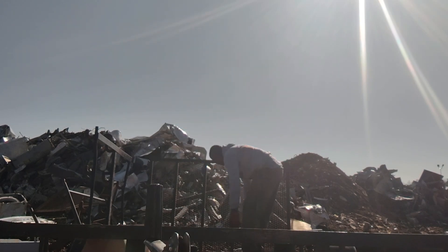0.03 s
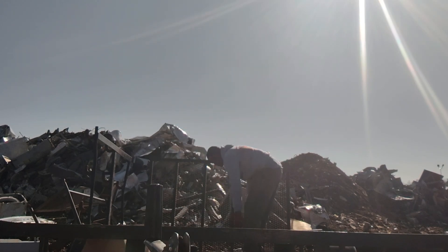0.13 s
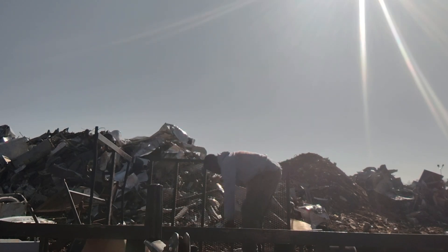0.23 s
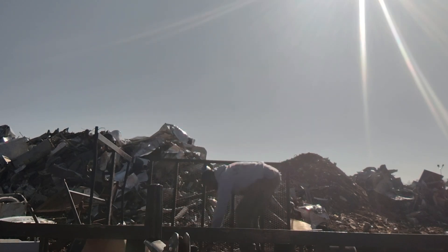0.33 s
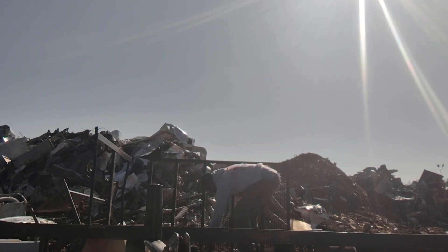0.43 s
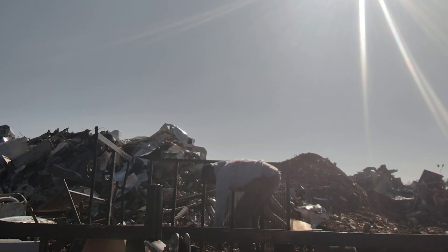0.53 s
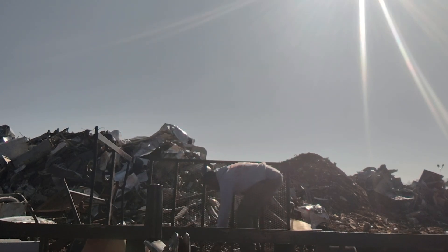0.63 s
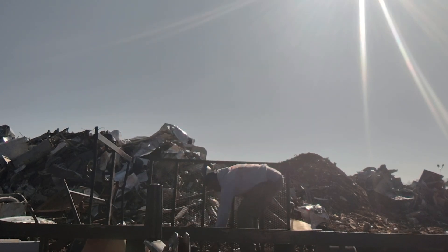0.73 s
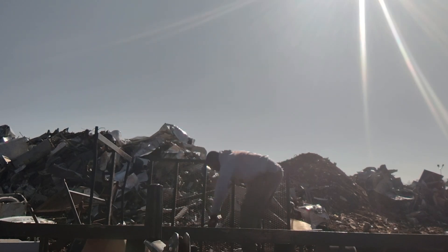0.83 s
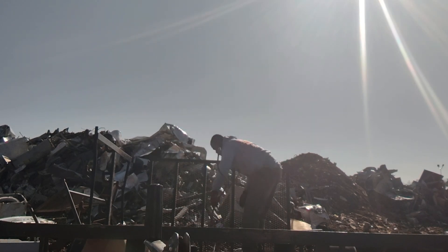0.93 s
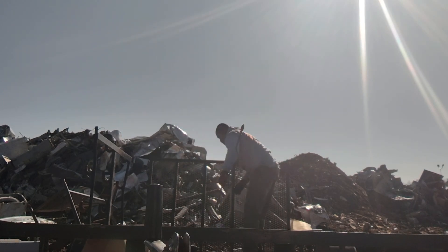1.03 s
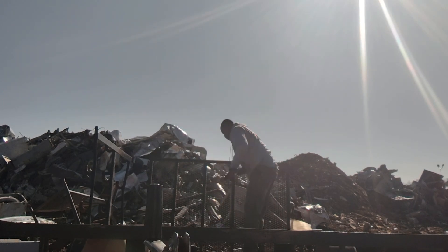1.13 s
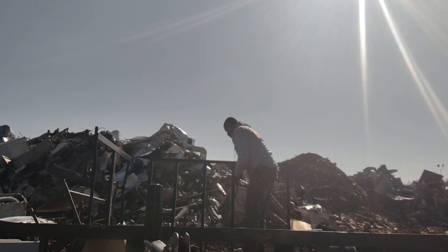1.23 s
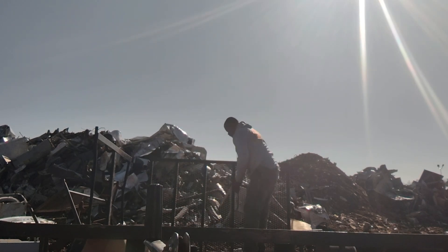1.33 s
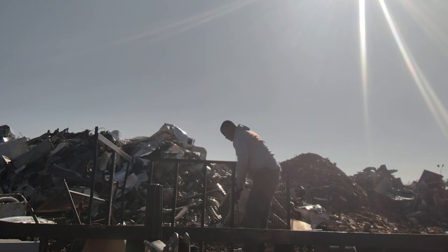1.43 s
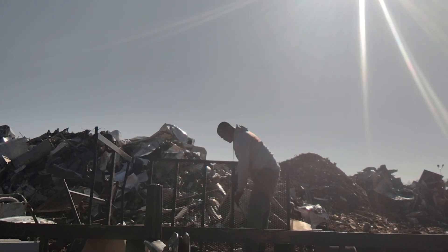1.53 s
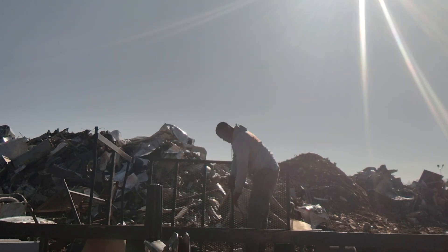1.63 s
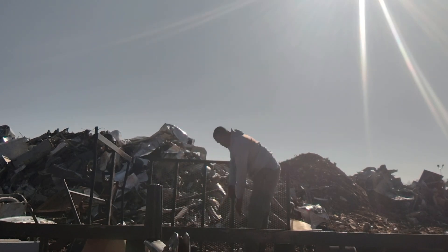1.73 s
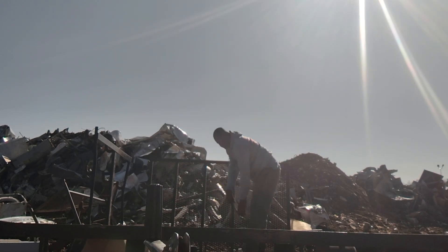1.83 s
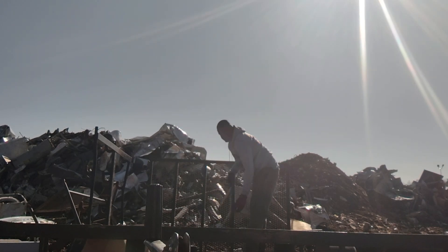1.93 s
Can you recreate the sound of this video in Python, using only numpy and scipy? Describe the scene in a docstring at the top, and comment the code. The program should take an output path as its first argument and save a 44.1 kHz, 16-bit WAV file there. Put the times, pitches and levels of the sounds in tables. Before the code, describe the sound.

Scrap metal clanks on a steel trailer deck: light taps, then a loud, dense clatter from 0.2 to 0.5 s with gritty scraping, bright clinks and a piercing squeal near 0.3 s. Softer knocks follow, a sharp clank at 0.9 s, scattered taps until 1.27 s, a lull, then a double knock with a faint ring at 1.72 s. Short heap echoes; a distant engine idles low beneath in the open yard.

```python
"""An open yard: a dragged edge scrapes and loose metal rattles on a steel trailer deck (shaped grains of noise),
while an engine idles some way off (pulses through resonances) over a steady bed of noise. Scrap pulled off
knocks the deck while small parts clink (decaying modes and noise); heaps throw back a short echo. A rubbed edge
squeals at two pitches (unsteady sines), and brief rings sound (resonated noise). The loudest peaks are limited
and the treble stops at 16 kHz."""
import sys
import numpy as np
from scipy import signal
from scipy.fft import rfft, irfft
from scipy.io import wavfile
from scipy.ndimage import uniform_filter1d

SR = 44100
rng = np.random.default_rng(int(sys.argv[2]) if len(sys.argv) > 2 else 0)


def digitize_waveform(pressure):
    """Quantize a signal to 16-bit integers and store it at the path in sys.argv[1].

    Rows of a 2-D input are taken as channels; values are limited to [-1, 1].
    """
    field = np.atleast_2d(pressure).T
    bounded = np.clip(field, -1, 1)
    quanta = np.round(bounded * 32767).astype(np.int16)
    wavfile.write(sys.argv[1], SR, quanta)


N = 88200
TIME_S = np.arange(N) / SR


def undb(db):
    """Turn dB into an amplitude factor."""
    return 10 ** (np.asarray(db) / 20)


def level(x, db):
    """Scale a sound to an rms level in dB."""
    return x * undb(db) / np.sqrt(np.mean(x ** 2))


def colour(x, table):
    """Weight the spectrum by (Hz, dB) points joined on a log frequency axis."""
    points = np.array(table)
    f = np.fft.rfftfreq(x.shape[-1], 1 / SR) + 1  # +1 Hz avoids log(0)
    gain_db = np.interp(np.log(f), np.log(points[:, 0]), points[:, 1])
    return irfft(rfft(x) * undb(gain_db), x.shape[-1])


def walk(rate):
    """Wander smoothly around zero, with `rate` new random targets a second and a spread near 2."""
    hold = int(SR / rate)
    steps = np.repeat(rng.standard_normal(N // hold + 1), hold)
    return 2.9 * uniform_filter1d(uniform_filter1d(steps, hold), hold)[:N]


def resonate(x, hz, width_hz):
    """Ring one mode; a narrower width rings longer."""
    return signal.lfilter(*signal.iirpeak(hz, hz / width_hz, fs=SR), x)


def patter(per_s, spread_db, grain_s, table):
    """Scatter dense small impacts of uneven size, each a short burst of noise."""
    hits = (rng.random(N) < per_s / SR) * undb(spread_db * rng.exponential(size=N))
    fade = np.exp(-np.arange(SR // 20) / SR / grain_s)
    power = np.convolve(hits ** 2, fade)[:N]
    return level(colour(np.sqrt(power) * rng.standard_normal(N), table), 0)


def blows(events, modes, octaves, rise_s, noise_db):
    """Each blow rings the modes near its centre, with a burst of noise centred alike."""
    scatter_db = 2  # uneven mode strengths
    out, modes_hz = np.zeros(N + SR), np.array(modes)
    t = np.arange(SR // 4) / SR
    f = np.fft.rfftfreq(len(t), 1 / SR) + 1
    low_cut = 1 / (1 + (0.33 * modes_hz[0] / f) ** 6)
    high_cut = 1 / (1 + (f / (3.16 * modes_hz[-1])) ** 3)
    for at, peak_db, centre_hz, t60 in events:
        def bell(hz):
            return np.exp(-.5 * (np.log2(hz / centre_hz) / octaves) ** 2)

        strength, detune, phase = rng.standard_normal((3, len(modes_hz)))
        weights = undb(scatter_db * strength) * bell(modes_hz)
        blow_hz = modes_hz * (1 + 0.0044 * detune)
        ring = weights @ np.sin(2 * np.pi * np.outer(blow_hz, t) + phase[:, None])
        spectrum = rfft(rng.standard_normal(len(t))) * bell(f) * low_cut * high_cut
        noise = irfft(spectrum, len(t))
        decay = np.exp(-np.log(1000) * t / max(t60, .005))
        blow = (1 - np.exp(-t / rise_s)) * decay * (level(ring, 0) + level(noise, noise_db))
        start = int(at * SR)
        out[start:start + len(t)] += blow * undb(peak_db) / np.abs(blow).max()
    return out[:N]


# A dragged edge on the deck. Each row: start in seconds, length in seconds, level in dB.
SCRAPE_SPANS = [(-.02, 0.068, -43.5), (0.078, 0.041, -35.5), (0.199, 0.19, -30), (0.429, 0.034, -39.5),
                (0.882, 0.035, -26.5), (0.947, 0.413, -56), (1.655, 0.15, -51), (1.751, 0.069, -41.5)]
# Treble colour of the scrape. Each row: frequency in Hz, weight in dB.
SCRAPE_TINT = [(1000, -42), (3700, -0.5), (6000, -2), (9200, -8), (16000, -8.5)]


def scrapes():
    """A dragged edge makes a dense grit of tiny impacts, heard in the treble."""
    rise_s, fade_s = 0.018, 0.023
    drag = np.zeros(N)
    for at, span, db in SCRAPE_SPANS:
        rise = np.clip((TIME_S - at) / rise_s, 0, 1)
        fade = np.exp(-np.maximum(TIME_S - at - span, 0) / fade_s)
        drag += undb(db) * rise * fade
    return patter(per_s=1500, spread_db=3, grain_s=.002, table=SCRAPE_TINT) * drag


# Loose metal on the deck. Each row: time in seconds, level in dB of the taps before the deck's ring is added.
RATTLE_LEVELS = [(0, -36), (0.186, -44), (0.212, -29.5), (0.402, -24.5), (0.501, -35.5), (0.618, -41),
                 (.87, -37.5), (.92, -33), (1.099, -41.5), (1.6, -58.5), (1.72, -47), (1.76, -38.5),
                 (1.902, -50), (2, -43.5)]
# Colour of the taps. Each row: frequency in Hz, weight in dB.
RATTLE_TINT = [(150, -11.5), (300, 5), (600, 5.5), (1500, -0.5), (2400, -7), (3400, -16), (5000, -19.5)]
# Modes of the steel deck, shared with the knocks. Each entry: frequency in Hz.
DECK_MODES = [321, 432.5, 499.5, 659.6, 774.5, 893.6, 1055, 1229.6, 1498, 1625, 1925, 2172]


def rattle():
    """Loose pieces tap the deck and ring its modes."""
    at, db = np.array(RATTLE_LEVELS).T
    taps = patter(per_s=700, spread_db=2.2, grain_s=.002, table=RATTLE_TINT)
    deck = sum(resonate(taps, hz, width_hz=35) for hz in DECK_MODES)
    return (taps + deck) * undb(np.interp(TIME_S, at, db))


# Exhaust and casing resonances. Each row: frequency in Hz, width in Hz, weight in dB.
ENGINE_MODES = [(200.6, 11.8, -4), (304.8, 20, 3), (646, 13.9, -14)]


def engine():
    """Idling some way off, uneven firings ring the exhaust and casing."""
    firing_hz, scatter_db, level_db = 35.86, 1.5, -48
    cycle = np.cumsum(firing_hz * (1 + 0.0024 * walk(2))) / SR
    firings = np.diff(np.floor(cycle), prepend=0) * undb(scatter_db * rng.standard_normal(N))
    pulses = np.convolve(firings, np.hanning(SR // 800))[:N]
    body = np.zeros(N)
    for hz, width_hz, db in ENGINE_MODES:
        body += undb(db) * resonate(pulses, hz, width_hz) * hz / width_hz
    return level(colour(body, [(120, -22), (170, -9)]), level_db)


# Colour of the open yard. Each row: frequency in Hz, weight in dB.
YARD_TINT = [(25, -24.5), (100, -25), (175, -1), (320, 5.5), (700, -23), (1300, -11.5), (3300, -28),
             (16000, -34.5)]


def yard():
    """The steady bed of the open yard is coloured noise."""
    return level(colour(rng.standard_normal(N), YARD_TINT), -48)


# Pieces knocking the deck. Each row: start in seconds, peak in dB at the source, centre in Hz,
# time to fall 60 dB in seconds.
DECK_KNOCKS = [(.063, -18, 1570, 0.028), (.097, -23.5, 1380, 0.043), (.202, -17.5, 790, 0.067),
               (.2135, -1, 1850, 0.024), (.2185, -1.5, 1430, 0.051), (.233, -6.5, 810, 0.055),
               (.268, -8.5, 1650, 0.14), (.293, -11.5, 537, 0.056), (.305, -19, 684, 0.087),
               (.324, -10.5, 1400, 0.049), (.338, -14, 1720, 0.2), (.373, -2.5, 1780, 0.0113),
               (.385, -9, 1700, 0.038), (.4305, -9.5, 660, 0.1), (.449, -9, 594, 0.11),
               (.506, -17, 590, 0.13), (.654, -18.5, 1600, 0.045), (.734, -20, 1570, 0.027),
               (.811, -26, 1620, 0.041), (.817, -17, 1650, 0.011), (.906, -5.5, 1850, 0.029),
               (.918, -18.5, 740, 0.086), (.947, -20.5, 1550, 0.015), (.967, -13, 1730, 0.022),
               (1.0155, -14.5, 403, 0.023), (1.044, -22, 500, 0.016), (1.088, -20, 1070, 0.036),
               (1.113, -26, 2100, 0.024), (1.1955, -18, 1870, 0.019), (1.222, -23.5, 1650, 0.047),
               (1.247, -9.5, 1695, 0.033), (1.267, -29, 1490, 0.026), (1.7205, -6.5, 1465, 0.022),
               (1.7225, -11.5, 750, 0.032)]


def knocks():
    """Pieces of scrap strike the deck and ring the modes near each blow's centre."""
    return blows(DECK_KNOCKS, DECK_MODES, octaves=0.46, rise_s=0.00059, noise_db=-7)


def heap_echo(near):
    """Heaps scatter the near sounds back as a short, dulled, decaying tail."""
    gap_s, t60_s, echo_db, top_hz = 0.003, 0.28, -10, 3600
    t = np.arange(SR // 3) / SR
    tail = rng.standard_normal(len(t)) * np.exp(-np.log(1000) * t / t60_s) * (t > gap_s)
    tail /= np.sqrt(np.sum(tail ** 2))
    echo = signal.fftconvolve(near, tail)[:N] * undb(echo_db)
    return signal.lfilter(*signal.butter(1, top_hz, fs=SR), echo)


# Small parts clinking. Each row: start in seconds, peak in dB at the source, centre in Hz,
# time to fall 60 dB in seconds.
PART_CLINKS = [(.147, -23.5, 8340, 0.014), (.251, -18, 9900, 0.011), (.344, -9.5, 10400, 0.021),
               (.371, -5.5, 10900, 0.018), (.424, -31, 10900, 0.012), (.6535, -16, 6650, 0.03),
               (.693, -20, 8300, 0.092), (.735, -24.5, 10300, 0.015), (.8805, -11.5, 8700, 0.014),
               (.9195, -12, 7960, 0.071), (1.195, -27.5, 4840, 0.048), (1.223, -35, 4180, 0.036),
               (1.2465, -14, 4500, 0.034), (1.721, -31, 4410, 0.07), (1.761, -24.5, 11500, 0.2)]
# Modes of the small parts. Each entry: frequency in Hz.
PART_MODES = [4420, 5070, 5430, 6424, 7470, 10280, 10940, 11740, 13350, 13720]


def clinks():
    """Small parts ring high modes under a stronger burst of noise."""
    return blows(PART_CLINKS, PART_MODES, octaves=0.87, rise_s=0.00011, noise_db=5)


# Higher and lower squeal of a rubbed edge. Each row: time in seconds, rms level in dB before panning.
HIGH_SQUEAL = [(.238, -34), (.254, -21.5), (.294, -9.5), (.308, -30), (.319, -18), (.366, -26.5),
               (.374, -39)]
LOW_SQUEAL = [(.25, -48), (.256, -30.5), (.286, -32), (.306, -23), (.324, -23), (.338, -36.5)]


def squeal(table, hz, pan_db):
    """A rubbed edge sings one slightly unsteady sine; positive pan leans left."""
    at, db = np.array(table).T
    phase = 2 * np.pi * np.cumsum(hz * (1 + 0.0022 * walk(130))) / SR
    tone = np.sin(phase) * np.sqrt(2) * undb(np.interp(TIME_S, at, db, -120, -120))
    return tone * undb(np.array([[.5], [-.5]]) * pan_db)


# Brief rings. Each row: start in seconds, length in seconds, frequency in Hz, rms level in dB before fading.
BRIEF_RINGS = [(0.373, 0.02, 5860, -19), (0.668, 0.14, 5680, -46), (0.975, 0.027, 5460, -39),
               (1.76, 0.094, 3770, -38), (1.763, 0.19, 5840, -47.5)]


def rings():
    """Rough rubbing, as noise, keeps single modes sounding for a moment."""
    out = np.zeros(N)
    for at, span, hz, db in BRIEF_RINGS:
        mode = level(resonate(rng.standard_normal(N), hz, width_hz=70), db)
        rise, fade = (TIME_S - at) / 0.0026, (at + span - TIME_S) / span
        out += mode * np.clip(np.minimum(rise, fade), 0, 1)
    return out


# Left-right difference. Each row: frequency in Hz, weight in dB.
SIDE_TINT = [(300, -11), (1200, -14), (3500, -8), (13000, -6)]


def wander(mid):
    """Sounds shift a little left and right from moment to moment."""
    side = colour(mid * np.tanh(walk(150)), SIDE_TINT)
    return mid + np.outer([1, -1], side)


def scene():
    """Set the metal and its echo in the yard with the engine, then add the squeals."""
    near = scrapes() + rattle() + knocks() + clinks() + rings()
    metal = near + heap_echo(near)
    # low cut: the metal sounds are thinned below about 200 Hz
    thin = signal.lfilter(*signal.butter(2, 204, "high", fs=SR), metal)
    stereo = wander(thin + engine() + yard())
    high = squeal(HIGH_SQUEAL, hz=11016, pan_db=-5.5)
    low = squeal(LOW_SQUEAL, hz=4214, pan_db=7.0)
    return stereo + high + low


def record(dry):
    """The loudest peaks are limited and the treble stops at 16 kHz."""
    limited = np.clip(1.06 * dry, -.8, .8)
    top_cut = signal.ellip(10, .2, 80, 16000, fs=SR, output="sos")
    return .94 * signal.sosfilt(top_cut, limited)


dry = scene()
out = record(dry)
digitize_waveform(out)
```